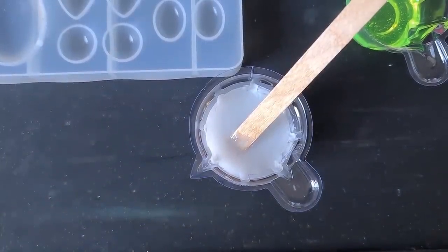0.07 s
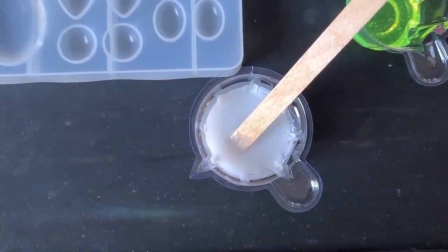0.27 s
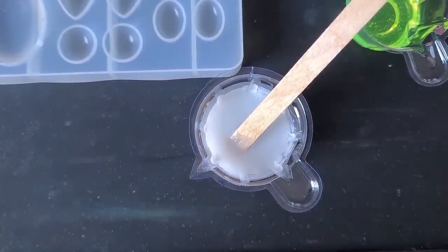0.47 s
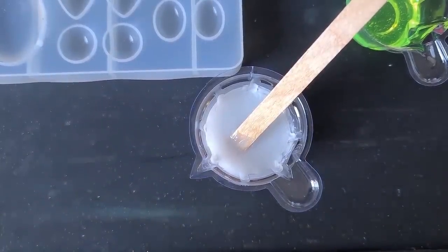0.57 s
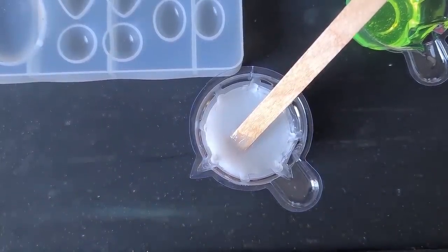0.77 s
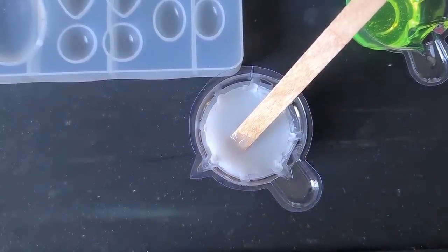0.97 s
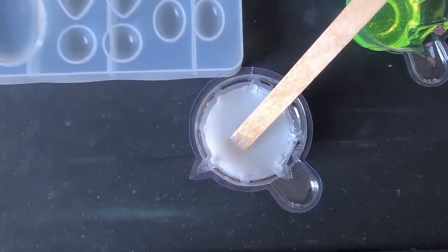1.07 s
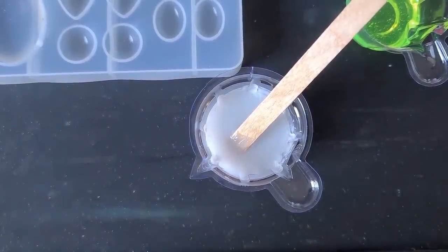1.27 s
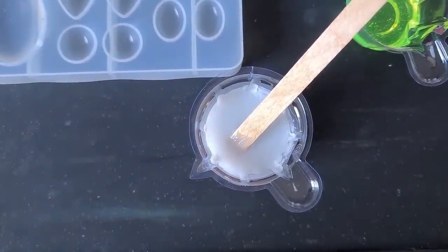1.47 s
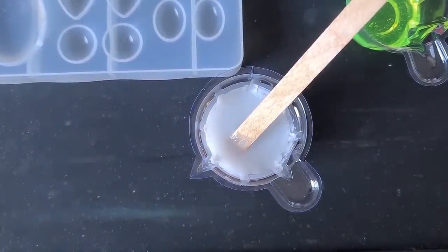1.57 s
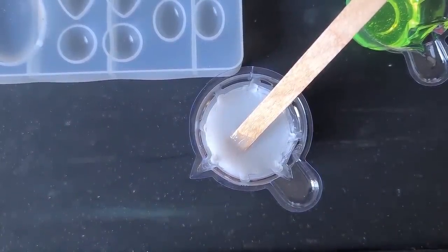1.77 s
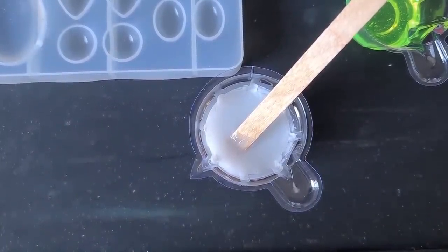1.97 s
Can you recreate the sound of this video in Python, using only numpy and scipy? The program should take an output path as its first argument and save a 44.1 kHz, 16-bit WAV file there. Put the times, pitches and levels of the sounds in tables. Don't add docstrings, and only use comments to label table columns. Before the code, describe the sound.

A small plastic bottle of liquid is shaken briskly and steadily; a mixing ball knocks the wall at each end of the swing amid short splashes and bubbly gulps, close, right of a stereo microphone pair, quiet room.

```python
import sys
import numpy as np
from scipy import signal
from scipy.fft import rfft, irfft
from scipy.io import wavfile
from scipy.ndimage import uniform_filter1d

SR = 44100
rng = np.random.default_rng(int(sys.argv[2]) if len(sys.argv) > 2 else 0)


def wrap_up_sound(samples):
    columns = np.atleast_2d(samples).T
    tamed = np.clip(columns, -1, 1)
    steps = np.round(tamed * 32767).astype(np.int16)
    wavfile.write(sys.argv[1], SR, steps)


def volts_from_db(level):
    exponent = np.asarray(level, float) / 20
    return 10 ** exponent


N = 88332
CONTACT_S, CONTACT_DELAY_S = 0.00045, 0.0006


def evened(x):
    return x / np.sqrt(np.mean(x ** 2) + 1e-20)


def read(points, hz):
    f, value = np.transpose(points)
    return np.interp(np.log(hz + 1), np.log(f + 1), value)


def add(mix, start_s, sound):
    part = mix[max(round(start_s * SR), 0):][:len(sound)]
    part += sound[:len(part)]


def shape(x, db_at):
    hz = np.fft.rfftfreq(x.shape[-1], 1 / SR)
    return irfft(rfft(x) * volts_from_db(db_at(hz)), x.shape[-1])


# (frequency [Hz], level [dB])
AIR_SPECTRUM = [(14, -27), (28, 1), (55, 2.5), (120, -5.5), (1500, -15), (4000, -18), (7000, -27.5),
                (15500, -30), (16500, -44)]
# (frequency [Hz], left-right correlation [0-1])
AIR_LIKENESS = [(60, 0.65), (300, 0.73), (1000, 0.067), (4000, 0.065)]


def air():
    level_db, patch_db = -61.5, 1.3
    frames, hz = N // 256 + 5, np.fft.rfftfreq(1024, 1 / SR)
    a, b, c, d, patches = rng.standard_normal((frames, 513, 5)).T
    patches = evened(uniform_filter1d(uniform_filter1d(patches, 8, 0), 12, 1))
    same = read(AIR_LIKENESS, hz)[:, None]
    left = a + 1j * b
    right = same * left + np.sqrt(1 - same ** 2) * (c + 1j * d)
    spectra = np.array([left, right]) * volts_from_db(read(AIR_SPECTRUM, hz)[:, None] + patch_db * patches)
    noise = signal.istft(spectra, nperseg=1024, noverlap=768)[1][:, :N]
    return volts_from_db(level_db + np.array([[-.8], [.8]])) * evened(noise)


def bubble_grain(hz, t, rise, decay_cycles):
    return np.sin(2 * np.pi * hz * t * (1 + rise * hz * t)) * hz * t * np.exp(-hz * t / decay_cycles)


def gurgle():
    bubbles_per_s, pitches = 400, 12
    out, t = np.zeros(N), np.arange(1024) / SR
    for hz in np.geomspace(350, 2000, num=pitches):
        clicks = rng.uniform(-1.1, 1, N) * (rng.random(N) < bubbles_per_s / pitches / SR)
        out += signal.oaconvolve(clicks, bubble_grain(hz, t, .02, 1.5))[:N]
    return evened(out)


def droplets():
    drops_per_s, spread_db = 4500, 2.6
    t, out = np.arange(512) / SR, np.zeros(N)
    pitches = np.geomspace(300, 14000, num=24)
    size = volts_from_db(spread_db * np.minimum(rng.exponential(1, N), 4))
    size = size * (rng.random(N) < drops_per_s / SR)
    kind = rng.integers(0, len(pitches), N)
    for k, hz in enumerate(pitches):
        grain = bubble_grain(hz, t, .015, 3.56)
        grain = grain / np.linalg.norm(grain) * np.sqrt(hz)
        out += signal.oaconvolve(size * (kind == k), grain)[:N]
    return evened(out)


# (start [s], level [dB], decay [dB/s], lean [dB]: raises the bright copy and lowers the dull
LOW_SPLASHES = [
    (-.04, -42.5, 223, -7),
    (0.188, -44.5, 168, 0),
    (0.422, -46, 171, 2.5),
    (0.661, -44.5, 174, 2.3),
    (0.898, -45.5, 194, 0),
    (1.123, -49, 118, -3),
    (1.358, -59, 172, 19.5),
    (1.384, -62.5, 148, 21),
    (1.582, -46, 218, -0.7),
    (1.819, -43.5, 193, -14),
]
# (start [s], level [dB], decay [dB/s], lean [dB]: raises the bright copy and lowers the dull
HIGH_SPLASHES = [
    (.07, -42.5, 172, -26.5),
    (.285, -48.5, 187, 4.5),
    (.53, -55, 264, 12.5),
    (.77, -51.5, 208, 8.5),
    (1.0, -49.5, 210, 3.7),
    (1.232, -49, 298, 1),
    (1.47, -56, 210, 4),
    (1.67, -48, 276, -17),
    (1.92, -53, 152, 1),
]
# (frequency [Hz], level [dB])
FIZZ_SPECTRUM = [(120, -55), (300, -21.5), (1000, -1), (1800, 2.9), (4200, 0), (6700, -7), (7400, -12.5),
                 (16000, -27)]


def splash(table, rise_s):
    smooth_share, gurgle_db = .5, -10.5
    hold_s, drain_s, dulling_db_per_s = .015, .25, 60
    lead_db, lead_db_per_s = -15.5, 255
    flat = np.sqrt(1 - smooth_share) * droplets() + np.sqrt(smooth_share) * rng.standard_normal((2, N))
    flat = flat + volts_from_db(gurgle_db) * gurgle()
    dull = shape(flat, lambda hz: read(FIZZ_SPECTRUM, hz) - 3 * np.log2((hz + 50) / 2500))
    bright = shape(flat, lambda hz: read(FIZZ_SPECTRUM, hz) + 3 * np.log2((hz + 50) / 2500))
    t = np.arange(N) / SR
    dull_power, bright_power = np.zeros((2, N))
    for start_s, db, decay_db_per_s, tilt_db in table:
        age = np.maximum(t - start_s, 0)
        rise = np.sin(np.pi / 2 * np.minimum(age / rise_s, 1)) ** 2
        fall_db = decay_db_per_s * np.maximum(age - rise_s - hold_s, 0) * (0.93 + age / drain_s)
        lead_in = volts_from_db(db + lead_db - lead_db_per_s * abs(t - start_s))
        swell = np.maximum(rise * volts_from_db(db - fall_db), lead_in)
        lean_db = tilt_db - dulling_db_per_s * np.maximum(age - .07, 0)
        dull_power += (swell * volts_from_db(-np.maximum(lean_db, -3))) ** 2
        bright_power += (swell * volts_from_db(np.maximum(lean_db, -30))) ** 2
    return .5 * (np.sqrt(dull_power) * evened(dull) + np.sqrt(bright_power) * evened(bright))


def nearer_end(s):
    starts = np.array([row[0] for row in LOW_SPLASHES])
    return int(s - starts[starts < s].max() > .075)


# (time [s], peak [dB], pitch [Hz], length [s])
GULP_EVENTS = [(.0025, -32, 2400, 0.0014), (0.027, -40.5, 315, 0.0048), (.074, -42, 480, 0.0059),
               (0.112, -34.5, 635, 0.0027), (0.123, -42.5, 600, 0.0029), (0.2022, -29, 1145, 0.0052),
               (0.2042, -32, 1840, .003), (0.425, -38, 2000, 0.00095), (0.438, -35, 1450, .004),
               (0.447, -35, 1950, 0.0017), (0.543, -30.5, 1000, 0.0012), (.665, -35.5, 627, 0.0054),
               (0.6685, -31, 1730, 0.0041), (0.678, -28, 1480, 0.0028), (0.756, -44, 920, 0.0045),
               (0.81, -41, 1040, 0.0046), (0.776, -43, 830, 0.0062), (0.913, -26.5, 1780, 0.0033),
               (1.008, -42, 1060, 0.0047), (1.132, -44, 367, 0.011), (1.146, -26.5, 1400, 0.0017),
               (1.235, -39, 1300, 0.0019), (1.247, -40.5, 640, 0.0068), (1.377, -27.5, 1840, .003),
               (1.493, -41, 673, 0.005), (1.594, -35.5, 620, 0.0042), (1.6176, -24.5, 1600, 0.0016),
               (1.673, -54.5, 224, 0.017), (1.711, -37, 1060, 0.0035), (1.833, -25.5, 1090, 0.0087),
               (1.842, -33, 1790, 0.0027), (1.939, -45.5, 670, 0.0059)]


def gulps():
    gain_db, pitch_rise = -6.5, 0.024
    out = np.zeros((2, N))
    for s, db, hz, length_s in GULP_EVENTS:
        t = np.arange(0, 5 * length_s, 1 / SR)
        u = t / length_s
        tone = np.sin(2 * np.pi * hz * t * (1 + pitch_rise * (u - 1)))
        add(out[nearer_end(s)], s, volts_from_db(db + gain_db) * tone * 3 * u * np.exp(1 - 3 * u))
    return out


# (time [s], peak [dB], main ring [Hz], low ring [Hz], low ring level [dB])
LOW_HITS = [(0.0105, -33, 2680, 1890, -3), (0.2228, -22, 3730, 2020, -5), (0.2439, -30, 2770, 1810, -5),
            (0.4557, -17.5, 3080, 2060, -20.5), (0.4791, -35, 2780, 1640, -13),
            (0.6922, -18, 3550, 1130, -21), (0.7167, -37, 3660, 1810, -4), (0.9288, -20, 2610, 2000, -17),
            (0.9445, -30.5, 3000, 1580, 0), (0.956, -36.5, 2750, 1630, -12),
            (1.1622, -32, 2540, 1410, -10.5), (1.1867, -32, 2800, 1720, -7),
            (1.3712, -17.5, 3190, 1850, -14.5), (1.3908, -16, 3190, 1374, -10.5),
            (1.6203, -27, 2860, 1120, -4.5), (1.6438, -37, 2860, 1800, -5),
            (1.856, -23.5, 3830, 1860, -2.5), (1.8722, -27, 2560, 1280, -7), (1.8873, -35, 2380, 1760, -8)]
# (time [s], peak [dB], main ring [Hz], low ring [Hz], low ring level [dB])
HIGH_HITS = [(0.0861, -20, 4200, 2020, -15), (0.319, -21.5, 4130, 1696, -10),
             (0.555, -20.5, 4400, 1784, -8), (0.7962, -20.5, 4360, 1670, -12),
             (0.8704, -35.5, 2680, 1680, -8), (1.0268, -21, 3490, 1730, -8.5),
             (1.2375, -31.5, 2480, 1160, -8.5), (1.245, -24.5, 4180, 1750, -2.5),
             (1.4716, -38, 2930, 960, -7.5), (1.4945, -32, 2400, 1600, -13.5),
             (1.9558, -23.5, 3830, 2090, -2), (1.9685, -39, 2900, 1790, -14)]
# (side ring [Hz], level [dB], top ring [Hz], level [dB], crack [dB])
LOW_WALL_SPOTS = [(4560, -5, 3300, -30, -30), (3190, 5, 6500, -2, -16.5), (5000, 1, 5730, -12, -24),
                  (2560, -0.5, 6530, -7.5, -16.5), (4800, -4, 5200, -3, -30), (2540, -4.5, 5200, -9.5, -19),
                  (2560, 3, 4700, 2, -23), (3610, 0.5, 6500, -14, -18.5), (4760, 2, 5100, -9, -16),
                  (3550, -1, 5430, -15, -23), (3300, -21, 5660, -17, -15), (4070, -5, 6090, 2.5, -14),
                  (3700, -5, 5500, -24, -10.5), (4840, -5, 5750, -8, -5.5), (3920, 0.5, 5880, -9, -13),
                  (4030, -19, 6800, -16, -15), (3100, 5.5, 5820, 0, -16), (3100, 2.5, 6400, -3, -17),
                  (3340, -3, 6300, -17, -15)]
# (side ring [Hz], level [dB], top ring [Hz], level [dB], crack [dB])
HIGH_WALL_SPOTS = [(2540, 3.5, 6800, -22, -23), (3430, -3, 5970, -16.5, -9.5), (3310, 1, 5730, -21, -12),
                   (2450, 0, 5820, -8, -18), (4370, -10, 6610, -18, -14), (2480, 2, 4900, -18, -10),
                   (3340, 0, 6140, -5, -8), (2540, 4, 5000, -23, -33), (3770, -16, 5860, -5, -4),
                   (3630, -3.5, 6500, -29, -32), (2860, 6, 5100, -5, -29), (3680, -3, 5920, -5, -20)]
# (frequency [Hz], width [Hz], level [dB])
LOW_BODY_MODES = [(1195, 50, -37.5), (2400, 3150, 15), (6940, 6600, -27)]
# (frequency [Hz], width [Hz], level [dB])
HIGH_BODY_MODES = [(367, 450, -26.5), (754, 3600, 14), (7750, 540, -16)]


def wall_ring(modes, t):
    scatter_db, facing_rad, rattle_db, rattle_t60_s = .5, .3, -14, .04
    ring = np.zeros((2, len(t)))
    for hz, width_hz, db in modes:
        level, detune, phase, facing = rng.standard_normal(4)
        turn = 0.085 * phase + facing_rad * facing * np.array([[1], [0]])
        tone = np.sin(2 * np.pi * hz * (1 + 0.02 * detune) * t + turn)
        ring += volts_from_db(db + scatter_db * level) * np.exp(-np.pi * width_hz * t) * tone
    ring *= (1 - np.exp(-t / CONTACT_S)) ** 2
    ring = signal.sosfilt(signal.butter(2, 280, "high", fs=SR, output="sos"), ring)
    rattle = echoes(np.pad(ring, ((0, 0), (0, 1024))), rattle_t60_s, 0.0013)[:, :len(t)]
    return ring + volts_from_db(rattle_db) * rattle


def contact_crack(t):
    t60_s, centre_hz, facing = .009, 9500, .55
    a, b = rng.standard_normal((2, len(t)))
    grit = np.array([facing * (a + b), b]) * volts_from_db(-60 * t / t60_s) * np.minimum(t / CONTACT_S, 1)
    band_hz = [0.43 * centre_hz, 0.92 * centre_hz]
    return signal.sosfilt(signal.butter(1, band_hz, "band", fs=SR, output="sos"), grit)


def knocks(table, spots, body):
    gain_db = 3
    out, t = np.zeros((2, N)), np.arange(2048) / SR
    for hit, spot in zip(table, spots):
        s, db, main_hz, low_hz, low_db = hit
        side_hz, side_db, top_hz, top_db, crack_db = spot
        modes = [(main_hz, 620, 0), (low_hz, 340, low_db), (side_hz, 650, side_db), (top_hz, 750, top_db)]
        ring, crack = wall_ring(modes + body, t), contact_crack(t)
        knock = ring / abs(ring).max() + volts_from_db(crack_db) * crack / abs(crack).max()
        for side in (0, 1):
            add(out[side], s + CONTACT_DELAY_S, volts_from_db(db + gain_db) * knock[side])
    return out


# (time [s], peak [dB], ring [Hz])
TICK_EVENTS = [(0.0741, -35, 3900), (.2004, -45, 4240), (0.2055, -34, 2900), (.4319, -54, 4610),
               (0.539, -43, 5230), (0.6655, -42, 2600), (0.9033, -38, 1870), (0.989, -39, 3000),
               (1.1229, -44, 2640), (1.1353, -54, 2790), (1.181, -43, 6500), (1.2121, -36, 3340),
               (1.281, -55, 2780), (1.511, -46, 3500), (1.536, -40, 3200), (1.5529, -45, 11000),
               (1.597, -45, 2750), (1.698, -49, 2520), (1.724, -40, 2800), (1.8302, -40, 3100),
               (1.923, -40, 4500), (1.9985, -40, 5900)]


def ticks():
    damping, grit_t60_s, grit_gain = .22, .009, .5
    out, t = np.zeros((2, N)), np.arange(400) / SR
    for s, db, hz in TICK_EVENTS:
        grit = np.diff(uniform_filter1d(rng.standard_normal(len(t) + 1), size=7))
        ring = np.sin(2 * np.pi * hz * t) * np.exp(-np.pi * damping * hz * t)
        tick = ring + grit_gain * grit * volts_from_db(-60 * t / grit_t60_s)
        tick = tick * np.minimum(t / CONTACT_S, 1)
        add(out[nearer_end(s)], s + CONTACT_DELAY_S, volts_from_db(db) * tick / abs(tick).max())
    return out


def seat(pair, lag_samples, left_minus_right_db):
    hz = np.fft.rfftfreq(N, 1 / SR)
    late = irfft(rfft(pair[0]) * np.exp(-2j * np.pi * hz * lag_samples / SR), N)
    return np.array([late * volts_from_db(left_minus_right_db / 2), pair[1] * volts_from_db(-left_minus_right_db / 2)])


def echoes(x, t60_s, start_s, gap=12):
    at = np.arange(int(start_s * SR), int(t60_s * SR) + 400, gap)
    at = at + rng.integers(0, gap, (2, len(at)))
    taps = np.zeros((2, at.max() + 1))
    np.put_along_axis(taps, at, rng.choice([-1., 1.], at.shape) * volts_from_db(-60 * at / SR / t60_s), 1)
    taps /= np.linalg.norm(taps, axis=1, keepdims=True)
    return signal.fftconvolve(x, taps, axes=1)[:, :N]


def scene():
    desk_db, room_db = -19, -17
    low, high = gulps() + ticks()
    low = low + splash(LOW_SPLASHES, rise_s=.018) + knocks(LOW_HITS, LOW_WALL_SPOTS, LOW_BODY_MODES)
    high = high + splash(HIGH_SPLASHES, rise_s=.022) + knocks(HIGH_HITS, HIGH_WALL_SPOTS, HIGH_BODY_MODES)
    bottle = seat(low, lag_samples=22.21, left_minus_right_db=-7.5)
    bottle = bottle + seat(high, lag_samples=8.19, left_minus_right_db=-0.38)
    desk = echoes(bottle, t60_s=.01, start_s=.0004)
    room = echoes(uniform_filter1d(low + high, size=5)[1:], t60_s=.18, start_s=.006)
    return bottle + volts_from_db(desk_db) * desk + volts_from_db(room_db) * room + air()


def roll_off(x):
    return signal.sosfilt(signal.butter(12, 16810, fs=SR, output="sos"), x)


def record(dry):
    edge_hz = 15950
    mix = signal.oaconvolve(dry, signal.firwin(127, edge_hz, fs=SR)[None], "same")
    return roll_off(mix)


dry = scene()
out = record(dry)
wrap_up_sound(out)
```